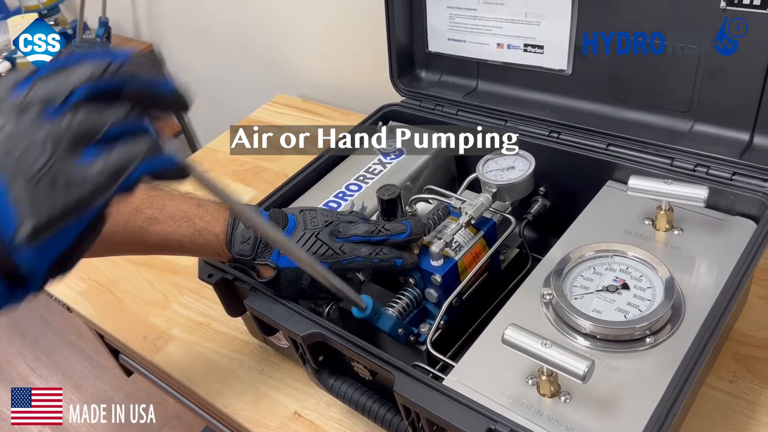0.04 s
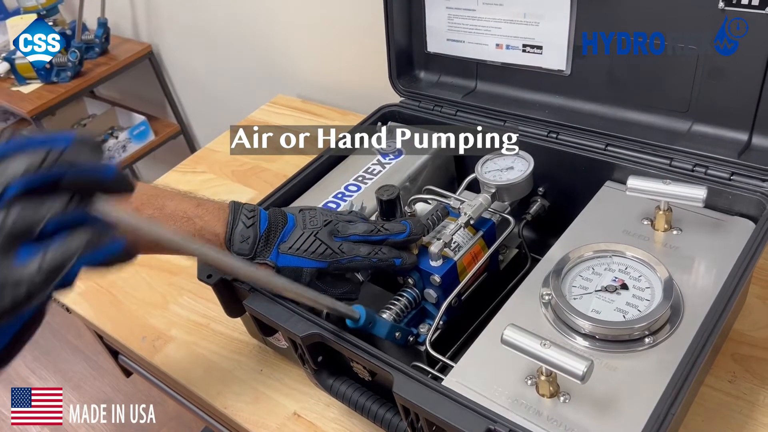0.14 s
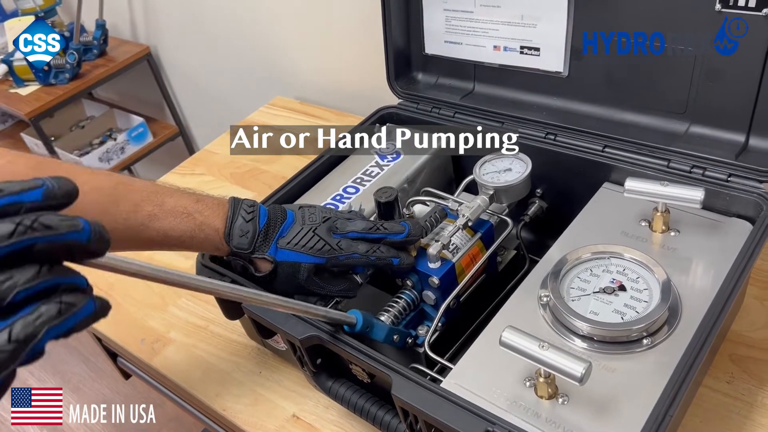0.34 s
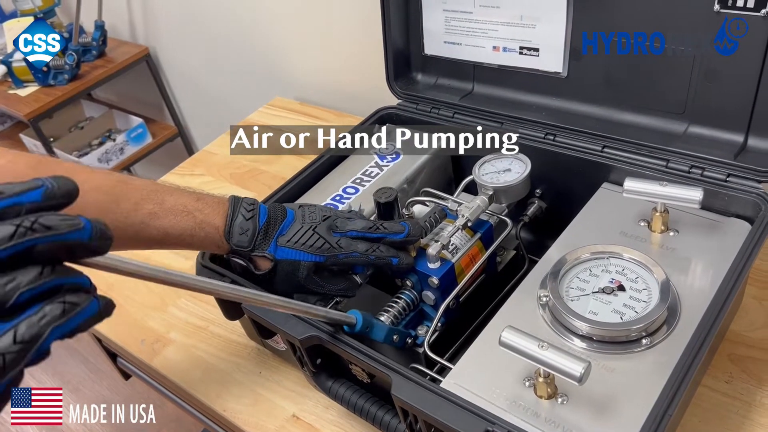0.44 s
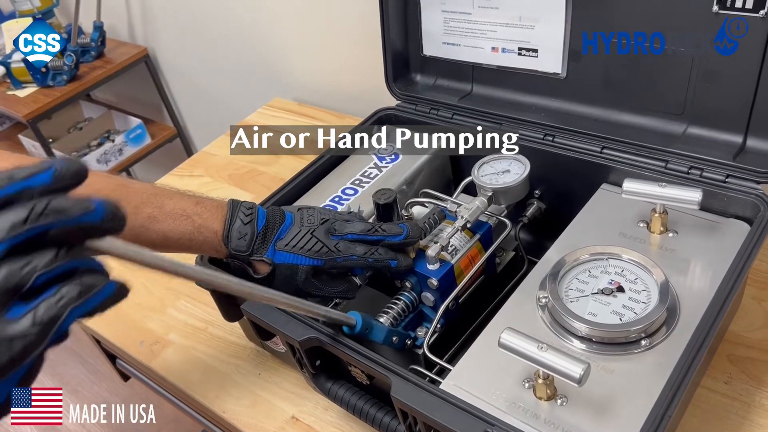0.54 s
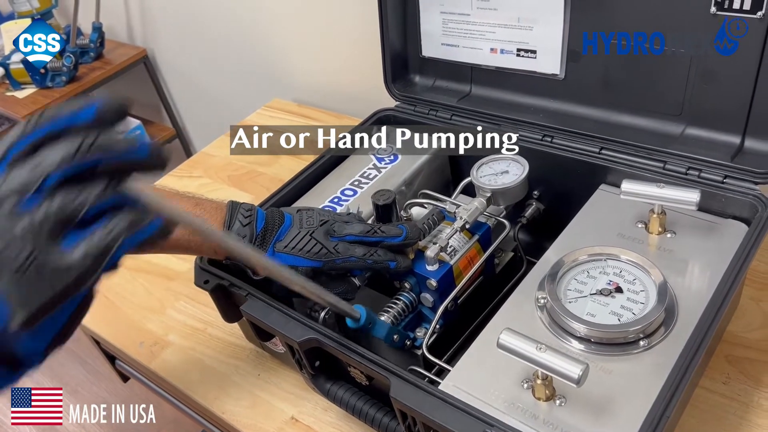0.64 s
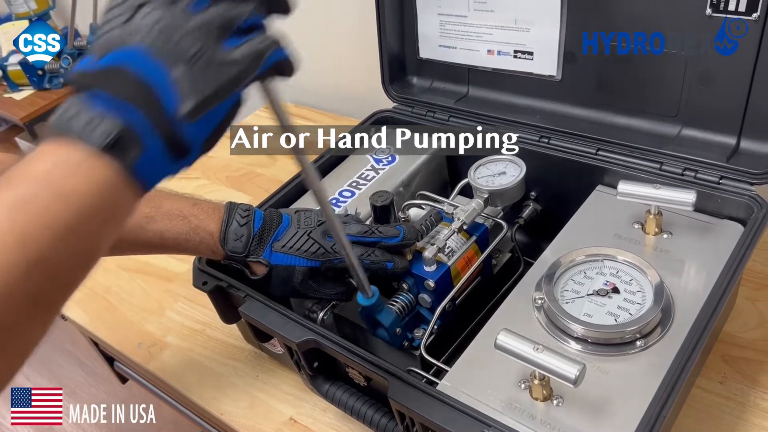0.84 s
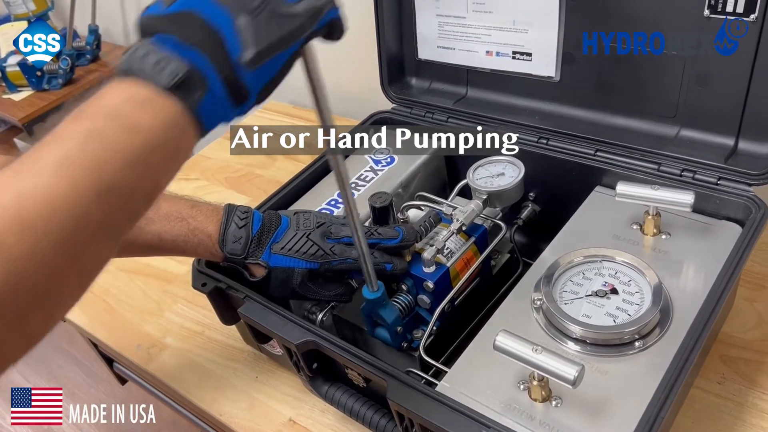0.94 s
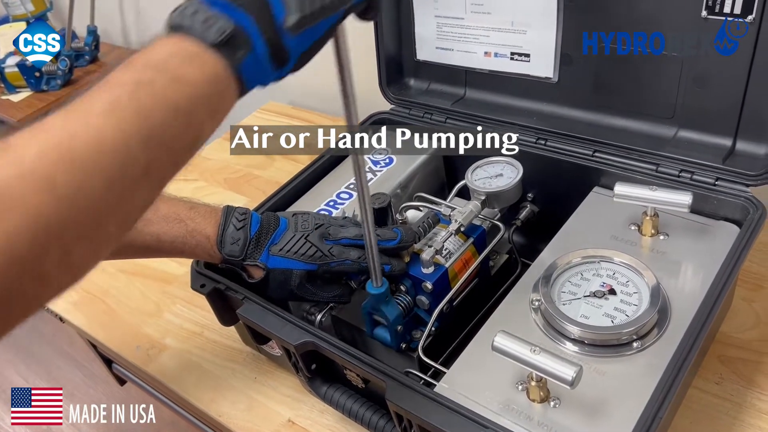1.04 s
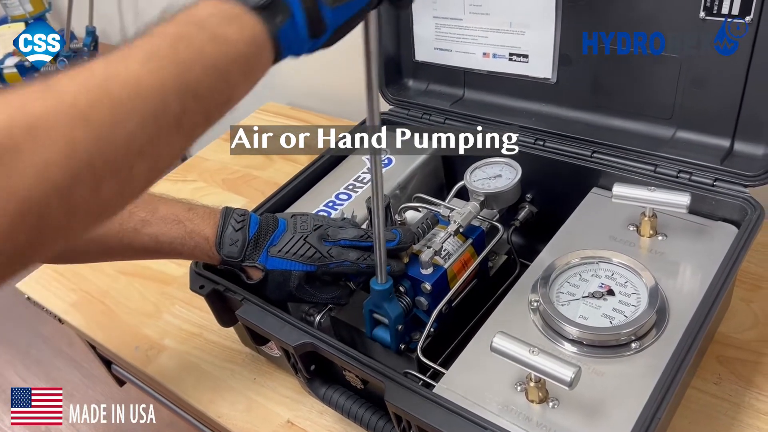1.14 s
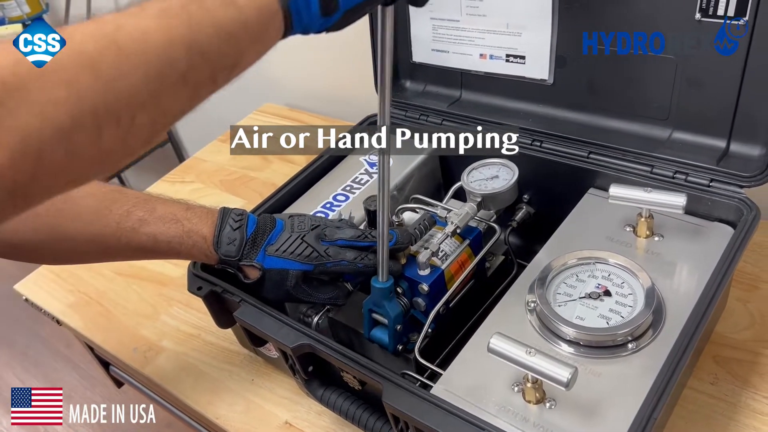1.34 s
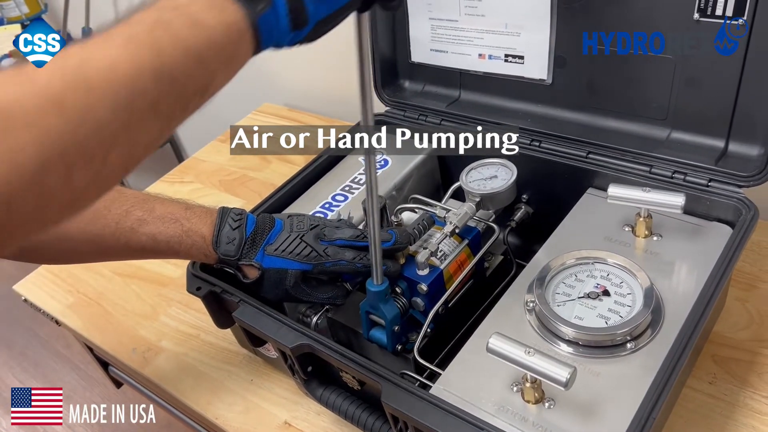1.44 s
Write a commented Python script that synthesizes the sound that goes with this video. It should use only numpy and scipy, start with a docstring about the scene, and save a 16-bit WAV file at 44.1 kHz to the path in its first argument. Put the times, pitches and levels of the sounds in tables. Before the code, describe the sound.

A hydraulic hand pump's steel lever clunks down, thudding its plastic case on a wooden table. It knocks, scrapes and clunks harder, then the piston rubs and oil hisses away, in a small room with a low hum.

```python
"""In a small room with a low hum and faint hiss, the steel lever of a hydraulic hand pump is pushed down.
It clunks against the pump block and the valve snaps; the plastic case thuds and the wooden table booms.
The loose handle knocks, the lever scrapes in its socket, then clunks harder as the lift takes up the play.
On the way up the piston rubs, its seal groans briefly and oil hisses through the valve.
The oil fades as the lever reaches the top, with one last soft knock and thud."""
import sys
import numpy as np
from scipy import signal
from scipy.fft import rfft, irfft, next_fast_len
from scipy.io import wavfile
from scipy.ndimage import map_coordinates

SR = 44100
rng = np.random.default_rng(int(sys.argv[2]) if len(sys.argv) > 2 else 0)


def to_wav(s):
    """Save 16-bit WAV."""
    ch = np.atleast_2d(s).T  # columns
    pcm = np.round(np.clip(ch, -1, 1) * 32767)  # PCM
    wavfile.write(sys.argv[1], SR, pcm.astype(np.int16))


N = 66150

# Stereo width. Each row: frequency in Hz, left-right likeness (1 is mono).
STEREO_LIKENESS = [(60, 0.92), (150, 0.92), (300, 0.86), (600, 0.67), (1200, 0.49), (2500, -0.04),
                   (5000, 0.083), (8000, -0.18), (13000, 0.38)]
# The colour of the room tone. Each row: frequency in Hz, level in dB.
ROOM_TONE_SPECTRUM = [(20, -47), (35, 3.5), (55, 1), (80, -1.5), (150, -2.5), (300, -21), (550, -13.5),
                      (740, -26.5), (820, -29.5), (1020, -15.5), (1500, -49), (3500, -49.5), (9000, -33),
                      (16000, -55.5)]
# The case rocks on the table. Each row: start in seconds, level in dB, brightness in Hz,
# shell ring in dB relative to the thud, ring centre in Hz, table boom in dB.
CASE_THUDS = [(0.176, -35.5, 660, 3, 245, -51), (0.201, -40, 535, 12.5, 295, -34),
              (.286, -50, 247, -14, 166.7, -70), (0.32, -39, 312, -3, 170, -32.5),
              (0.548, -42.5, 423, 0, 360, -37.5), (0.701, -36, 304, 1, 199, -45),
              (.713, -37, 276, 3, 190, -40), (0.737, -52, 447, -25, 400, -37.5),
              (.778, -45, 377, 12, 167, -48.5), (.88, -47, 360, -11, 284, -50),
              (1.438, -60, 620, -0.5, 490, -47.5)]
STEEL_SPREAD_OCT = 2.08  # how widely a blow on steel excites the modes around its centre


def amp(db):
    """Decibels to gain."""
    return 10 ** (np.asarray(db) / 20)


def unit(x):
    """Scale to rms 1."""
    return x / np.sqrt(np.mean(x ** 2) + 1e-20)


def clock():
    """Seconds at each sample."""
    return np.arange(N) / SR


def along(points, hz):
    """Read a curve of (Hz, value) points on a log frequency axis."""
    freqs, values = np.transpose(points)
    return np.interp(np.log(hz + 1), np.log(freqs + 1), values)


def envelope(points):
    """Gain at each sample from (seconds, dB) points."""
    return amp(np.interp(clock(), *np.transpose(points)))


def fade(t, t60):
    """Exponential decay, 60 dB down after t60 seconds."""
    return np.exp(-np.log(1000) * t / t60)


def filtered(x, response):
    """Equalise x with a gain that is a function of frequency."""
    size = next_fast_len(N + SR // 2)
    return irfft(rfft(x, size) * response(np.fft.rfftfreq(size, 1 / SR)), size)[..., :N]


def softened(x, hz, order):
    """Low-pass: a softer contact loses its treble."""
    return signal.sosfilt(signal.butter(order, min(hz, SR / 3), fs=SR, output="sos"), x)


def width_angle(hz):
    """Stereo width in radians: 0 is mono, pi/4 is fully wide."""
    return np.arccos(np.clip(along(STEREO_LIKENESS, hz), -1, 1)) / 2


def noise(spectrum):
    """Coloured stereo noise of rms 1, near mono in the bass."""
    def mid_side_gains(hz):
        return amp(along(spectrum, hz)) * [np.cos(width_angle(hz)), np.sin(width_angle(hz))]
    mid, side = filtered(rng.standard_normal((2, N)), mid_side_gains)
    return unit(np.array([mid + side, mid - side]))


def noise_decay(spectrum, t60s):
    """Noise as a dense crowd of modes, each band dying at its own speed."""
    hz, t, bands = signal.stft(noise(spectrum), SR, nperseg=256)
    return signal.istft(bands * fade(t, along(t60s, hz)[:, None]), SR, nperseg=256)[1][:, :N]


def ring(modes, centre_hz, spread_oct):
    """Damped modes, favoured around a centre set by the point of contact."""
    t, out = clock(), np.zeros((2, N))
    for (hz, db, t60), (jitter_db, side) in zip(modes, rng.standard_normal((len(modes), 2))):
        phase = np.sign(side) * width_angle(hz) * np.array([[1], [-1]])  # highs reach the ears out of step
        share = np.exp(-(np.log2(hz / centre_hz) / spread_oct) ** 2)
        out += share * amp(db + jitter_db) * fade(t, t60) * np.sin(2 * np.pi * hz * t + phase)
    return out


def add(track, start_s, sound, pan_db=0):
    """Mix a sound in at start_s; positive pan is to the left."""
    i = int(np.clip(round(start_s * SR), 0, N - 1))
    track[:, i:] += sound[..., :N - i] * amp([[pan_db / 2], [-pan_db / 2]])


def room(x, wet_db, rise_s=0.0011):
    """Add the small room's diffuse reverb."""
    # Reverb decay. Each row: frequency in Hz, T60 in seconds.
    decay = [(100, 0.92), (400, 0.68), (2000, 0.36), (6000, 0.36), (12000, 1)]
    # Reverb tone. Each row: frequency in Hz, gain in dB.
    colour = [(60, -2), (130, 2), (1000, 1.5), (3000, -0.5), (6000, 3), (12000, 1)]
    tail = noise_decay([(20, 0.0082), (20000, 0)], decay) * (1 - np.exp(-(clock() / rise_s) ** 2))
    wet = signal.fftconvolve(x, tail / np.linalg.norm(tail[0]), axes=1)[:, :N]
    return x + amp(wet_db) * filtered(wet, lambda hz: amp(along(colour, hz)))


def fan(centre_hz=674, half_width_hz=27):
    """A fan whirs in one narrow band of noise."""
    whir = filtered(noise(ROOM_TONE_SPECTRUM), lambda hz: 1 / (1 + ((hz - centre_hz) / half_width_hz) ** 4))
    return amp(-70.5) * unit(whir)


def room_tone(hum_hz=58):
    """A bed of rumble, low hum and thin high hiss that swells and sinks."""
    # The swell of the hiss. Each row: time in seconds, level in dB.
    hiss_levels = [(0, -66), (0.098, -76.5), (0.412, -75.5), (0.494, -87.5), (0.634, -65.5), (0.732, -77.5),
                   (1.166, -69.5), (1.4, -78.5), (1.48, -75.5)]
    # Its airy colour. Each row: frequency in Hz, level in dB.
    hiss_spectrum = [(8000, -81), (10500, -20), (11500, -10), (12500, -3.5), (15500, -11.5)]
    rumble = amp(-60) * noise(ROOM_TONE_SPECTRUM)
    hum = amp(-58.5) * np.sin(2 * np.pi * hum_hz * clock())
    return rumble + hum + envelope(hiss_levels) * noise(hiss_spectrum)


def oil_and_piston(grain_db=1.0, grain_hz=200):
    """Oil hisses smoothly through the valve over the grainy rub of piston and pivot."""
    # The swells of oil and rub. Each row: time in seconds, level in dB.
    oil_levels = [(0, -67), (.15, -72.5), (.21, -65.5), (.255, -63), (.3, -72), (.42, -78.5), (.57, -79),
                  (.598, -59), (.68, -66.5), (.74, -58), (.85, -61.5), (.98, -70), (1.17, -63),
                  (1.26, -66.5), (1.33, -83.5), (1.42, -82), (1.5, -69)]
    rub_levels = [(0, -83.5), (.08, -59), (.15, -64.5), (.5, -73), (.68, -62), (.76, -42.5), (.83, -47),
                  (.867, -48.5), (.91, -55), (.97, -60), (1.04, -71), (1.38, -71.5), (1.5, -60.5)]
    # Bright oil, dark rub. Each row: frequency in Hz, level in dB.
    oil_spectrum = [(300, 10.5), (1000, 4.5), (2200, 4.5), (3300, 3.5), (5000, 5), (7000, 2.5),
                    (9000, -0.5), (15000, -26.5)]
    rub_spectrum = [(80, -13.5), (180, 4.5), (330, 4), (550, -1.5), (1400, -10), (2500, -15), (4000, -23),
                    (9000, -51)]
    grain = map_coordinates(rng.standard_normal(N), [clock() * grain_hz])
    oil = envelope(oil_levels) * noise(oil_spectrum)
    rub = envelope(rub_levels) * unit(noise(rub_spectrum) * amp(grain_db * grain))
    return oil + rub


def scrape(start_s=0.422, end_s=0.53, edge_s=0.017):
    """The lever drags in its socket before the lift."""
    # Dull friction. Each row: frequency in Hz, level in dB.
    spectrum = [(300, 7.5), (700, -2), (1350, -1.5), (2200, -14.5), (3200, -25), (8000, -42)]
    t = clock()
    gate = (np.tanh((t - start_s) / edge_s) - np.tanh((t - end_s) / edge_s)) / 2
    return amp(-54.5) * gate * noise(spectrum)


def seal(start_s=.815, length_s=.045, from_hz=260, to_hz=400):
    """The piston seal gives one short groan that rises as the lift gathers speed."""
    progress = np.clip((clock() - start_s) / length_s, 0, 1)
    hz = from_hz + (to_hz - from_hz) * progress
    groan = amp(-41) * np.sin(np.pi * progress) * np.sin(2 * np.pi * np.cumsum(hz) / SR)
    return np.array([groan, groan])


def valve():
    """The check valve snaps in short, bright bursts."""
    # The snaps. Each row: start in seconds, level in dB.
    snaps = [(.174, -49), (0.2299, -44.5), (0.534, -68), (0.588, -53.5), (0.7032, -40)]
    # Their colour. Each row: frequency in Hz, level in dB.
    spectrum = [(500, -15.5), (1800, -1.5), (2800, 5), (4500, -1), (6500, -8.5), (9000, -1.5), (15000, -32)]
    out = np.zeros((2, N))
    for start_s, db in snaps:
        add(out, start_s, amp(db) * noise(spectrum) * fade(clock(), t60=0.023))
    return out


def handle(rise_s=0.0024):
    """The loose handle knocks in its socket: a hollow tone, quickly damped."""
    # The knocks. Each row: start in seconds, level in dB, pitch in Hz.
    knocks = [(.322, -31.5, 467), (.418, -46, 690), (1.419, -45.5, 611)]
    out, t = np.zeros((2, N)), clock()
    shape = fade(t, t60=0.047) * (1 - np.exp(-(t / rise_s) ** 2))
    for start_s, db, hz in knocks:
        add(out, start_s, amp(db) * np.sin(2 * np.pi * hz * t) * shape)
    return out


def table_boom(hz=114.66, rise_s=0.006):
    """Every thud of the case sets the wooden table top booming."""
    out, t = np.zeros((2, N)), clock()
    boom = np.sin(2 * np.pi * hz * t) * fade(t, t60=.4) * (1 - np.exp(-t / rise_s))
    for start_s, *_, boom_db in CASE_THUDS:
        add(out, start_s, amp(boom_db) * boom, pan_db=-1.8)
    return out


def case(rise_s=0.0019):
    """The case rocks on the table, and each dull thud rings its plastic shell."""
    # The shell's modes. Each row: frequency in Hz, level in dB, T60 in seconds.
    shell_modes = [(183.4, -2, 0.21), (237, -4, 0.16), (268, -14.5, 0.094), (370.4, -2.5, 0.14),
                   (438, -8.5, 0.15), (565, 4, 0.16)]
    # The thump's weight. Each row: frequency in Hz, level in dB.
    thump_spectrum = [(30, -39), (70, 9), (130, 12.5), (250, 8.5), (500, 10.5), (2000, -31)]
    # Its decay. Each row: frequency in Hz, T60 in seconds.
    thump_decay = [(100, 0.62), (600, 0.075)]
    out = np.zeros((2, N))
    attack = 1 - np.exp(-(clock() / rise_s) ** 2)
    for start_s, db, brightness_hz, ring_db, centre_hz, _ in CASE_THUDS:
        shell = amp(ring_db) * ring(shell_modes, centre_hz, spread_oct=0.65) * attack
        thump = softened(noise_decay(thump_spectrum, thump_decay), brightness_hz, order=4)
        add(out, start_s, amp(db) * (thump + shell))
    return out


def end_stop(start_s=.1755, centre_hz=1520):
    """At the bottom of the stroke the lever strikes the pump block and sets it ringing."""
    # The block's modes. Each row: frequency in Hz, level in dB, T60 in seconds.
    block_modes = [(545, 2, 0.072), (822, -3.5, 0.13), (1278, -0.5, 0.065), (2390, -6, 0.09),
                   (4830, -7.5, 0.04), (6510, -11, 0.06)]
    out = np.zeros((2, N))
    add(out, start_s, amp(-36) * ring(block_modes, centre_hz, STEEL_SPREAD_OCT))
    return out


def lever():
    """Each contact of the lever rattles the linkage and rings the steel."""
    # The contacts. Each row: start in seconds, level in dB, brightness in Hz, rise in seconds,
    # steel ring in dB relative to the contact, ring centre in Hz, pan in dB.
    clunks = [(0.167, -44, 2270, .001, -24, 1200, -6), (0.1742, -36.5, 3260, 0.00095, -2, 940, -1.5),
              (0.533, -46, 1900, 0.00068, -3, 1310, -2.5), (.544, -49.5, 1400, 0.00045, 4, 1300, -4),
              (0.685, -42.5, 1700, 0.0012, -16, 1460, -11), (0.7047, -31.5, 6470, 0.00098, 8.5, 1880, -1.5),
              (.714, -45, 3500, 0.0012, -19, 2470, 6.5)]
    # The lever's modes. Each row: frequency in Hz, level in dB, T60 in seconds.
    steel_modes = [(739.7, -2, 0.09), (915.5, -8.5, 0.1), (1407, -12, 0.097), (1610, -18.5, 0.14),
                   (1844, -25.5, 0.18), (2153, -10.5, 0.1), (2512, -3, 0.031), (3034, -8, 0.1),
                   (3030, -17.5, 0.07), (4650, -9, 0.028), (6950, -11, 0.032)]
    # The linkage's clatter. Each row: frequency in Hz, level in dB.
    clatter_spectrum = [(30, -47), (70, -44), (200, 6.5), (700, 1.5), (1100, -2.5), (1400, 2), (1800, -5),
                        (2900, -4), (3400, -12.5), (4700, -9.5), (7000, -28), (9000, -26), (15000, -43)]
    # Its decay. Each row: frequency in Hz, T60 in seconds.
    clatter_decay = [(150, 0.36), (800, 0.15), (3000, 0.16), (10000, 0.15)]
    out, t = np.zeros((2, N)), clock()
    for start_s, db, brightness_hz, rise_s, ring_db, centre_hz, pan_db in clunks:
        clatter = noise_decay(clatter_spectrum, clatter_decay)
        steel = amp(ring_db) * ring(steel_modes, centre_hz, STEEL_SPREAD_OCT)
        blow = (clatter + steel) * (1 - np.exp(-t / rise_s))
        add(out, start_s, amp(db) * softened(blow, brightness_hz, order=2), pan_db)
    return out


def scene():
    """One pump stroke over the room tone, with more reverb on the metal than on the body."""
    metal = room(lever() + end_stop() + valve(), wet_db=-7)
    body = room(case() + handle() + seal(), wet_db=-11) + table_boom()
    return metal + body + scrape() + oil_and_piston() + fan() + room_tone()


def record(dry, top_hz=15750):
    """The microphone cuts the lowest bass and the very top, and carves a deep notch in the treble."""
    # The microphone's colour. Each row: frequency in Hz, gain in dB.
    colour = [(25, -20), (45, 3.5), (7000, 0.5), (8700, -4.5), (9400, -19.5), (10200, -23.5), (10850, -17),
              (11250, 0)]
    return filtered(dry, lambda hz: amp(along(colour, hz)) * (hz < top_hz))


dry = scene()
out = record(dry)
to_wav(out)
```